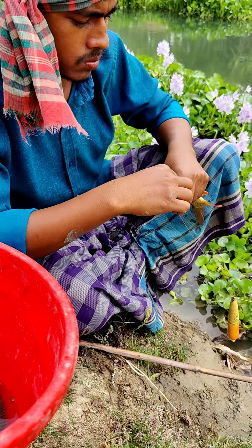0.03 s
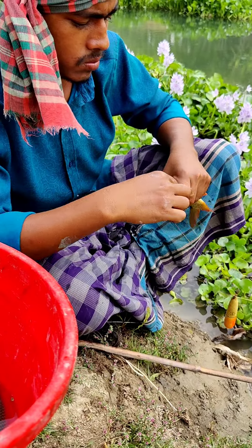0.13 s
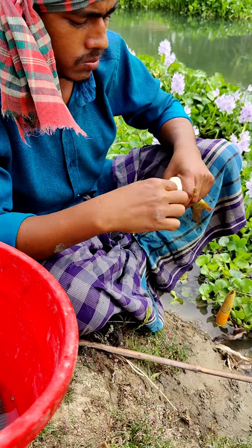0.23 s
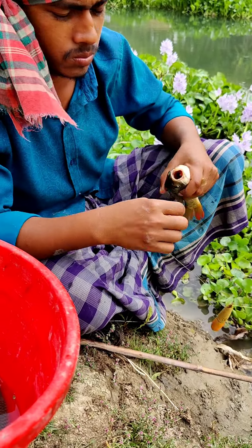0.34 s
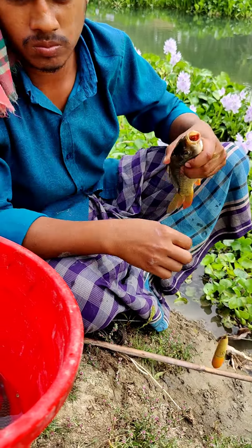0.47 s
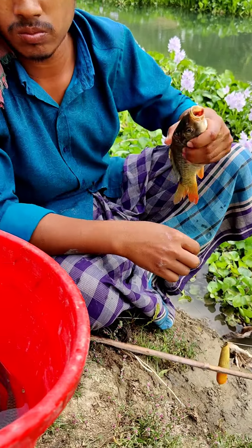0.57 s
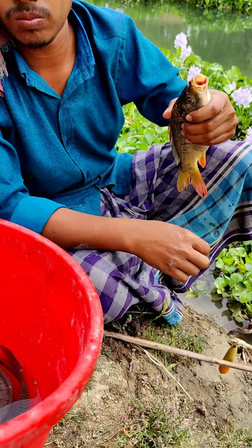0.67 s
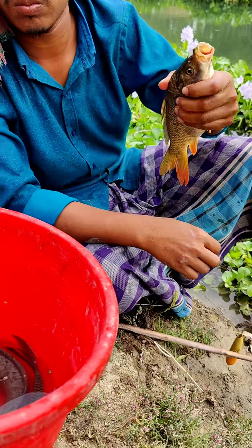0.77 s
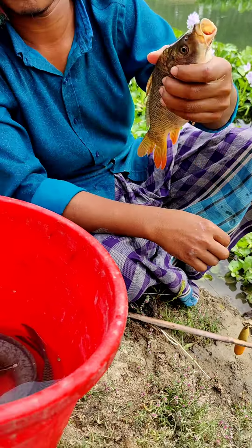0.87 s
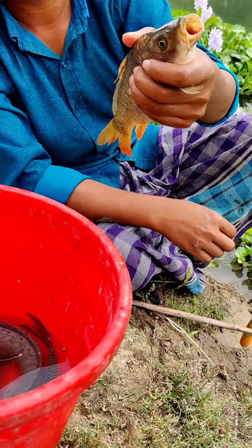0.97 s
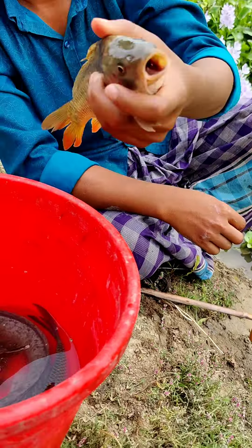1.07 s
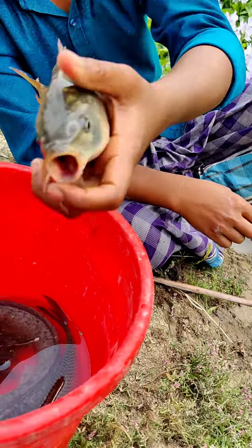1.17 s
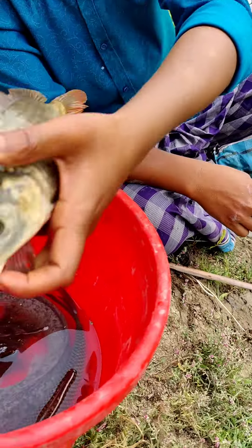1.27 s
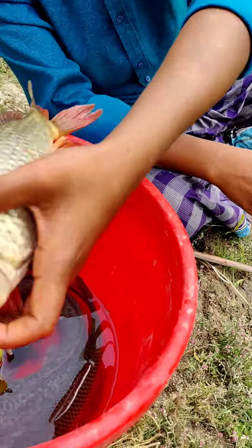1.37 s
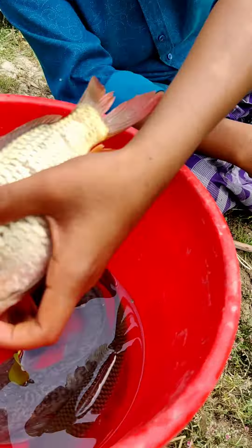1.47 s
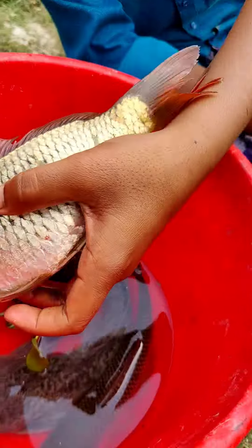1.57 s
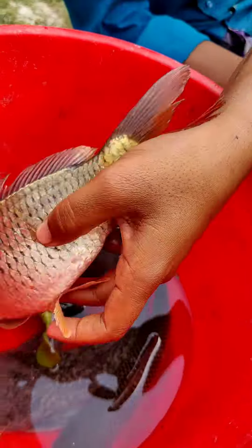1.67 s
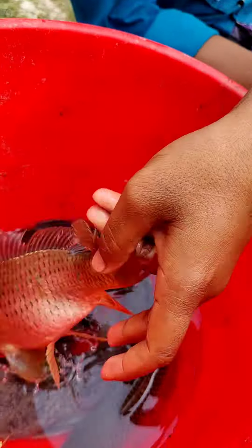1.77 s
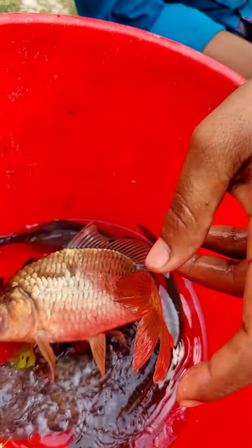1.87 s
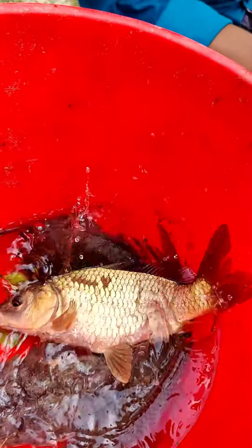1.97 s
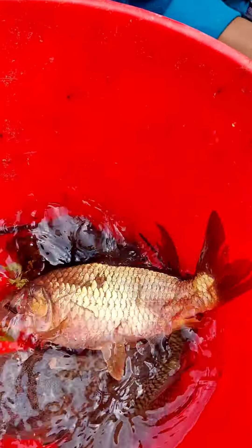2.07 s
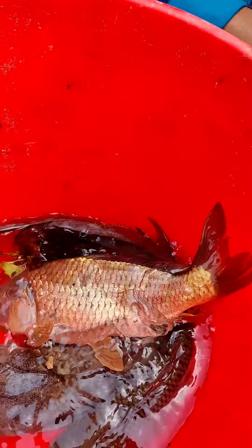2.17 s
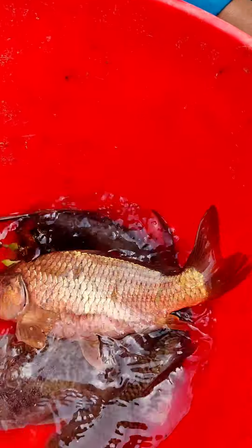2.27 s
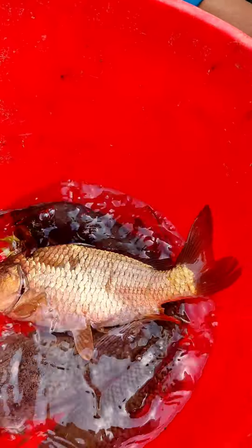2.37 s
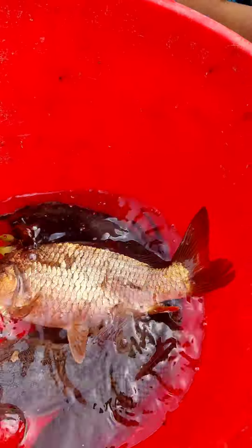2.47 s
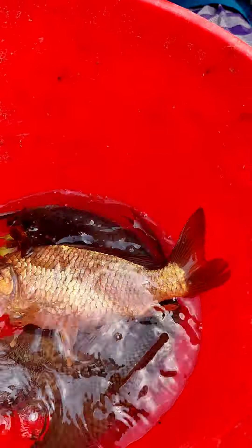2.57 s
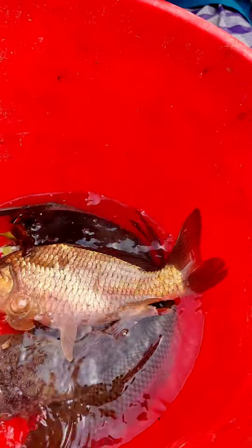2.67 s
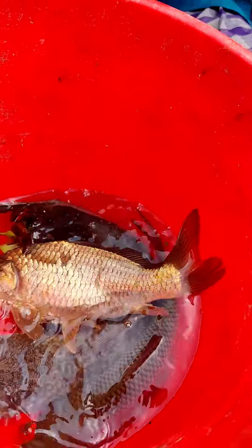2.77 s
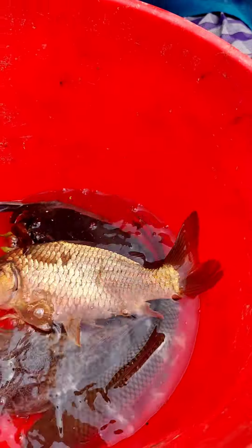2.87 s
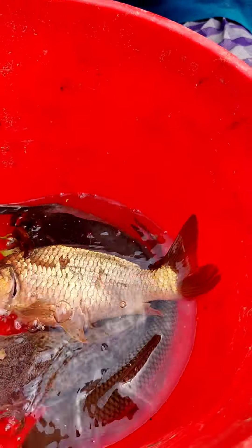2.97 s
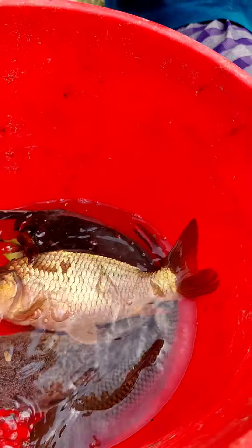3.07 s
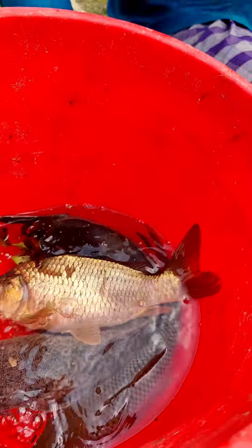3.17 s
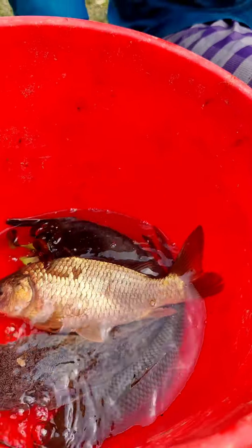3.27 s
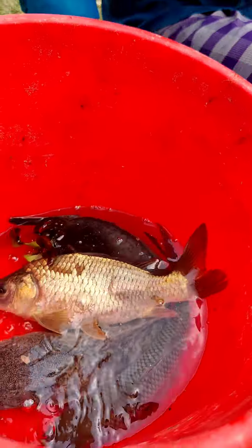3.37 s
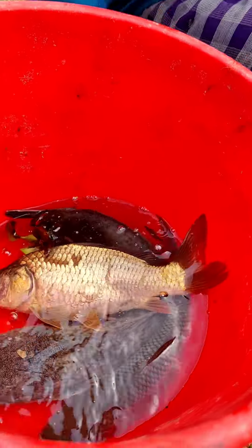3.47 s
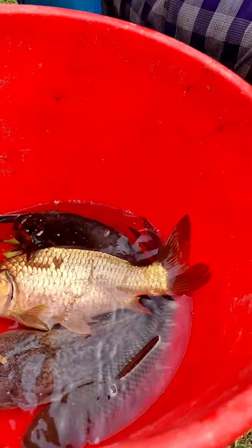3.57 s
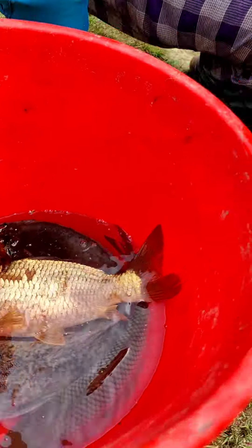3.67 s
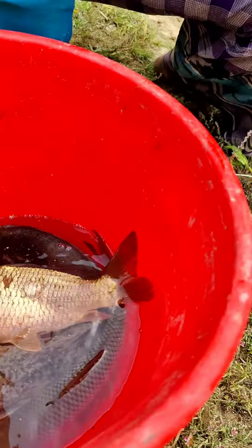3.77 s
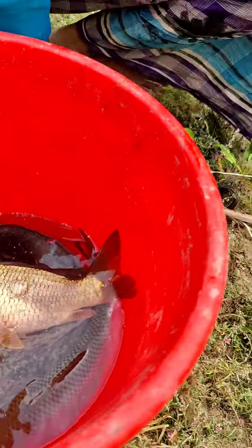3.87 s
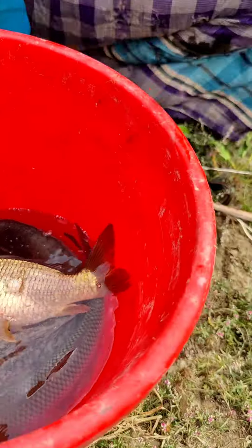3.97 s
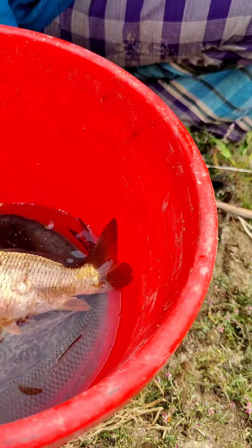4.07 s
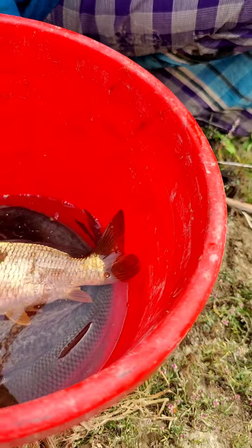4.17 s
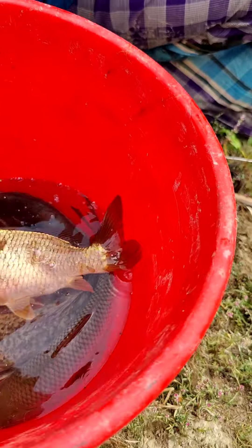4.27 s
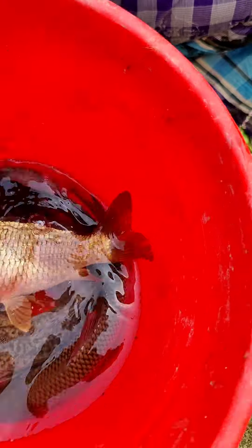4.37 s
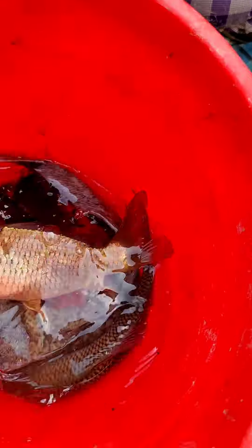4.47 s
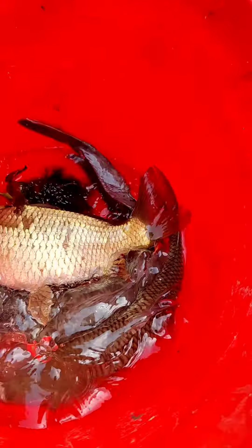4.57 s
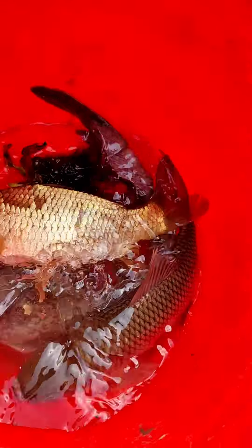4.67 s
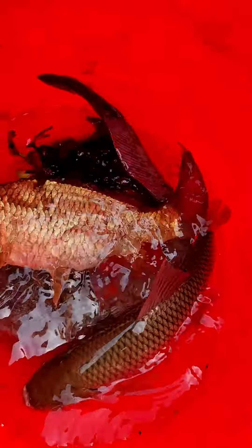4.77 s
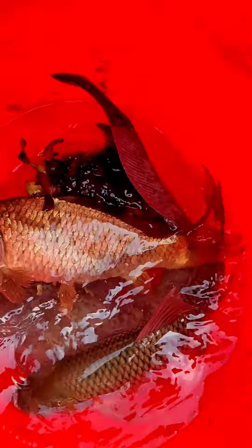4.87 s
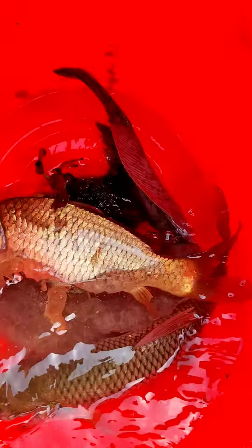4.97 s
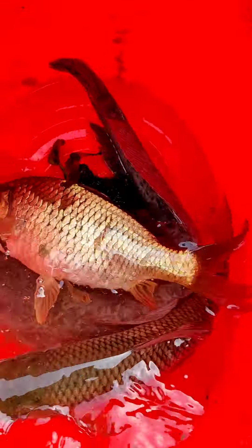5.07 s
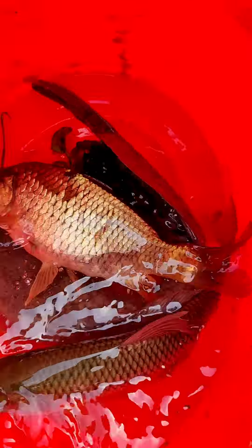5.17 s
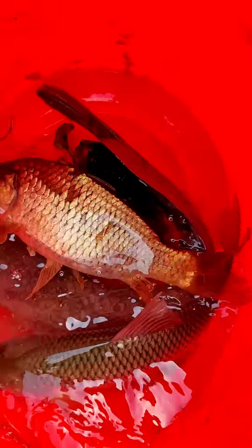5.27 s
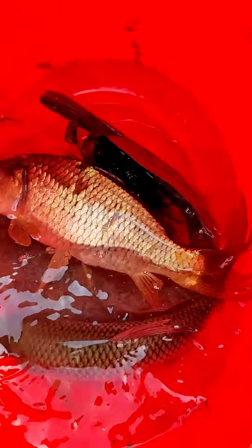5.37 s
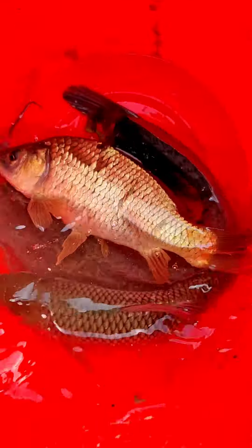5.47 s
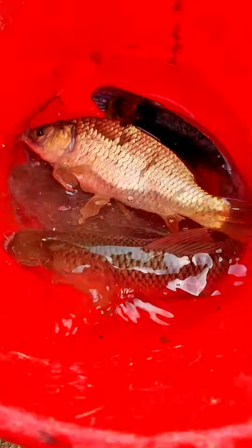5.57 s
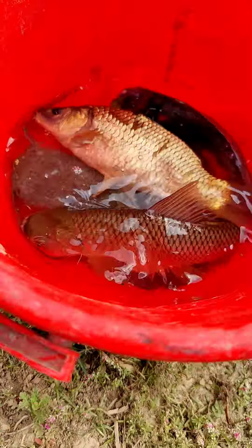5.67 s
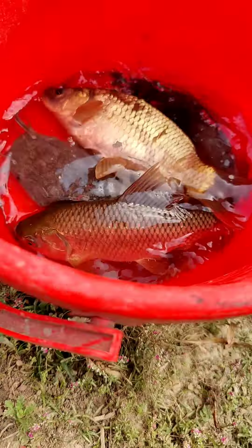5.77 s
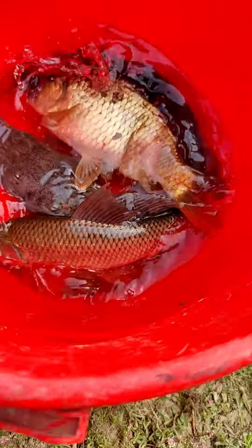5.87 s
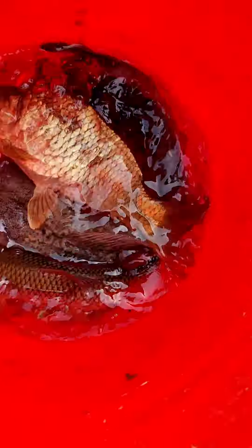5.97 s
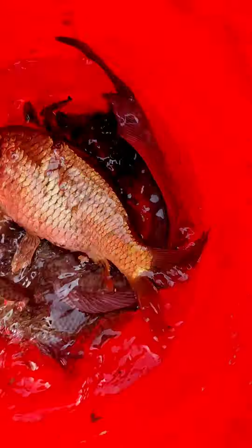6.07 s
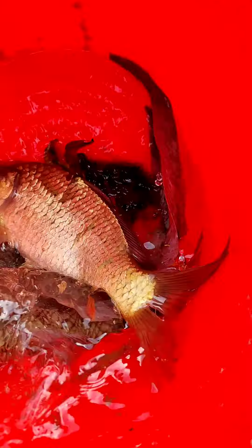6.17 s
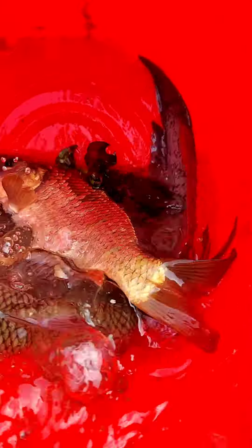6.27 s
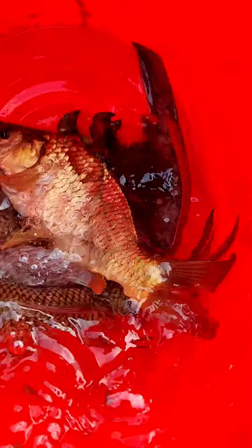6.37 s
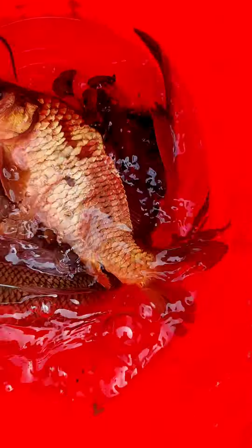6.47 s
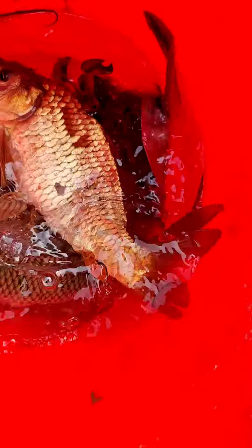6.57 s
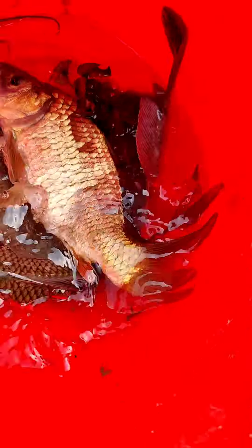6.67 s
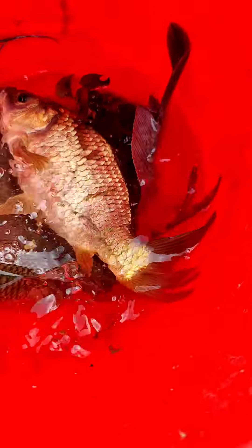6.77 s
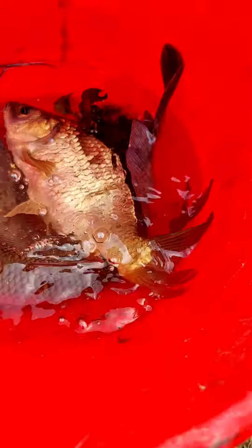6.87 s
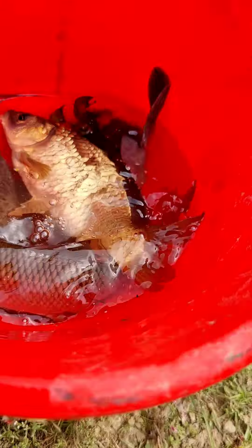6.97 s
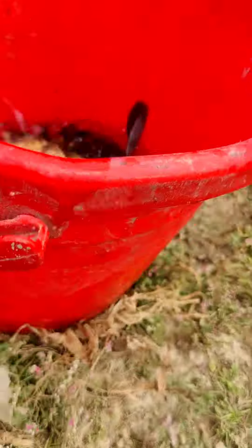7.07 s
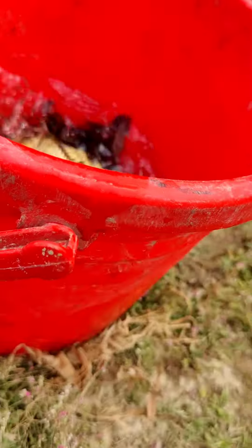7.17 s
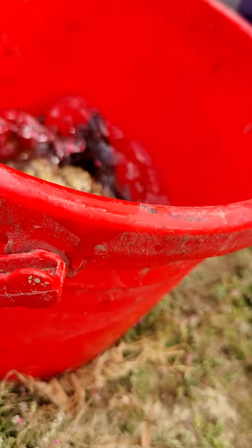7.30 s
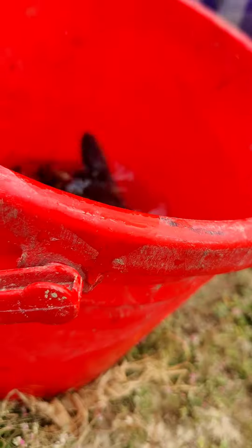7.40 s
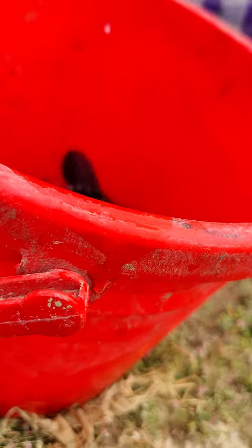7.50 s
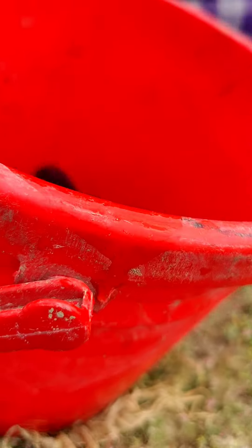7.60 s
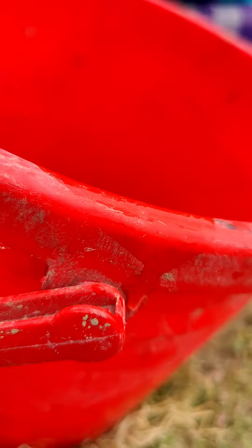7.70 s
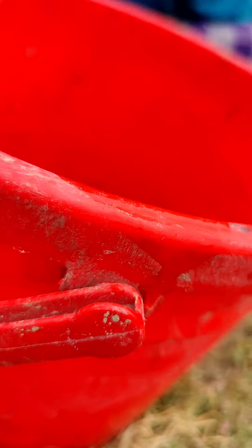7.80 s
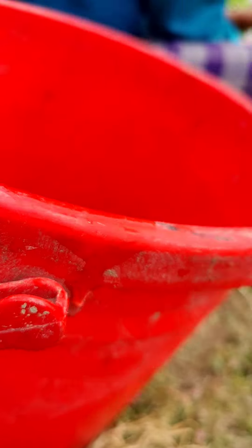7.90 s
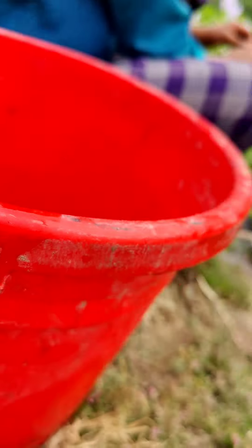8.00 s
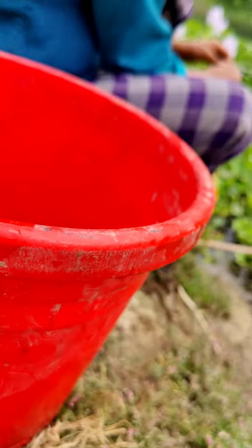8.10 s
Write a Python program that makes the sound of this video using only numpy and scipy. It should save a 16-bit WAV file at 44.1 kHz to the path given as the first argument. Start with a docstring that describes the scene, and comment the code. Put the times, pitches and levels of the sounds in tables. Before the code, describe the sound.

The opening is hushed: faint outdoor air, low rumble and a thin, high, pulsing insect trill, joined later by a second, rising rasp. At about 1.3 s a short, nasal bird call sounds faintly, with soft blurred far-off sounds. From 1.85 s a fish enters a plastic bucket close to the microphone: a soft thud, then a hard bright splash at 2.0 s with a rising bubble plop. Until 4.2 s it stays quiet, with small drips, low glugs around 2.9-3.2 s, a tiny upward gulp and another bird call at 3.6 s. At 4.3-5 s watery slosh, slaps and bubbles return, with muffled bumps and rubbing near 5.2 s. Sharp splashes burst out at 5.9 s, and thrashing with spray continues to 6.7 s. At 7.2 s a heavy, hollow boom hits the bucket, followed by quick slaps, bubbling and settling drips to 8 s.

```python
"""A carp is dropped into a plastic bucket where other fish lie in shallow water, on a river bank.
The fish thump the bucket (soft pulses of low tones), slap the water (swarms of noise bursts and droplets)
and churn up bubbles (gliding, ringing tones) and spray (coloured clicks), then writhe again in bouts.
Insects trill and rasp in the weeds (pulsed noise), a bird calls twice (arching harmonics through a
throat resonance), faint far-off sounds swell (banded noise) and the air rumbles faintly (coloured noise)."""
import sys
import numpy as np
from scipy import signal
from scipy.fft import rfft, irfft, next_fast_len
from scipy.io import wavfile

SR = 44100
rng = np.random.default_rng(int(sys.argv[2]) if len(sys.argv) > 2 else 0)


def int16_out(signal):
    """Quantize to a 16-bit WAV file."""
    q = np.round(np.clip(np.atleast_2d(signal).T, -1, 1) * 32767)
    wavfile.write(sys.argv[1], SR, q.astype(np.int16))


N = 358974
TIME = np.arange(N) / SR

# low rumble of the air: start_s, level_db
RUMBLE = [(0, -66.5), (1.7, -70), (3.3, -61.5), (4.2, -65), (6.3, -61), (8.1, -58)]
# tone colour of the rumble and of the outdoor hush: frequency_hz, relative_density_db
RUMBLE_COLOUR = [(20, -21), (40, 3), (60, 3), (85, -1), (120, -6.5), (170, -17), (260, -20), (500, -60)]
AIR_COLOUR = [(100, -24), (250, 7), (500, 3), (1000, 1), (2000, -4), (4000, -11.5), (7000, -12),
              (10000, -18), (13000, -14), (16000, -9.5)]
# trilling insect: start_s, syllables_per_s, level_db, pulsing_depth (0-1)
TRILL = [(0, 54, -75.5, 0.54), (.6, 28, -70.5, 0.3), (1.2, 62, -69.5, 0.3), (3, 34, -68, 0.2),
         (8.1, 49, -66, 0.28)]
# tone colour of the trill: frequency_hz, relative_density_db
TRILL_COLOUR = [(5200, -43), (5900, -34.5), (6400, -15), (6800, -6.5), (7150, -8.5), (7500, -14),
                (8200, -18), (8900, -24), (11000, -28), (13000, -39)]
# second insect, rasping upward: start_s, level_db
RASP = [(1.2, -93), (2.6, -71), (4.2, -78.5), (8.1, -82)]
# faint far-off sounds: start_s, level_db, length_s, centre_hz, width_hz
FAR_SOUNDS = [(0.592, -77.5, 0.09, 1920, 200), (1.30, -74, 0.48, 448, 202), (1.317, -75.5, 0.21, 1130, 400)]
# bird calls: start_s, level_db, pitch_hz (top of the arch)
BIRD_CALLS = [(1.295, -54, 873), (3.59, -56.5, 856)]
# hard slaps of tails and fins: start_s, level_db, fade_t60_s, low_edge_hz, high_edge_hz
SLAPS = [(1.635, -51, 0.028, 6870, 9600), (1.854, -49.5, .08, 1210, 4980), (1.884, -32.5, 0.069, 449, 7000),
         (1.901, -26, 0.027, 1310, 4710), (2.007, -14, .016, 2470, 12700), (2.037, -41, 0.11, 4600, 13300),
         (2.056, -36, .034, 1900, 13200), (2.064, -26, 0.064, 988, 12500), (2.131, -37, 0.027, 1130, 3070),
         (2.184, -32.5, 0.011, 3050, 12700), (2.296, -53, .05, 1030, 3750), (2.397, -55.5, .06, 1270, 3470),
         (2.661, -55, 0.025, 1110, 8500), (2.686, -48, 0.05, 434, 1350), (2.786, -47.5, 0.017, 3700, 13900),
         (2.826, -43.5, 0.027, 3070, 10800), (3.453, -51.5, 0.02, 1100, 3260),
         (3.647, -53.5, 0.018, 9800, 14000), (4.247, -45, 0.069, 1350, 2340),
         (4.31, -39.5, 0.078, 1440, 2880), (4.645, -42.5, 0.028, 910, 12600),
         (4.688, -38.5, 0.051, 4540, 14400), (4.745, -43, .02, 5030, 11600),
         (4.819, -33, 0.0077, 1130, 6030), (5.242, -45, 0.013, 1430, 12200),
         (5.374, -46.5, 0.042, 774, 1970), (5.875, -15, .013, 1930, 9900),
         (5.895, -28.5, 0.045, 3470, 10600), (5.927, -18.5, .018, 1574, 9650),
         (6.003, -24, .012, 5800, 9500), (6.036, -39, 0.028, 1440, 9700), (6.061, -37.5, 0.016, 6300, 8500),
         (6.192, -34.5, .016, 2070, 12900), (6.22, -32, 0.052, 1950, 9100), (6.377, -28, 0.014, 1410, 8700),
         (6.399, -27.5, .016, 6240, 10830), (6.41, -33.5, .022, 1190, 4940),
         (6.454, -36.5, 0.02, 6200, 12300), (6.532, -46.5, 0.029, 4030, 11700),
         (6.598, -35, 0.016, 2480, 10500), (6.652, -44, 0.037, 5250, 12600),
         (7.204, -29.5, 0.067, 2270, 12500), (7.231, -29.5, .032, 876, 4870),
         (7.251, -37, .016, 4550, 11600), (7.288, -27, 0.0076, 1230, 11500),
         (7.299, -26.5, 0.02, 1330, 8640), (7.423, -38, 0.067, 1210, 12300),
         (7.475, -36, 0.05, 1036, 10200), (7.502, -41, 0.022, 1230, 12000),
         (7.554, -30.5, 0.021, 950, 8150), (7.576, -41.5, 0.048, 970, 6150),
         (7.657, -38.5, 0.025, 680, 3760), (7.683, -36.5, .027, 884, 12100),
         (7.745, -41.5, 0.018, 680, 3600), (7.779, -46.5, 0.042, 585, 3660)]
# resonances of the bucket's inside: frequency_hz, width_hz, level_db
INSIDE = [(923, 136, -1.5), (1294.4, 337, 9.5), (1301, 310, 9.5), (1830, 660, -5.5), (2495, 150, -7),
          (3273, 880, -19.5), (4100, 59, -22.5)]
# bouts of writhing: start_s (at full strength), build_up_s, length_s, slosh_db, spray_db
BOUTS = [(1.871, 0.052, 0.19, -57, -61.5), (2.28, .1, 0.39, -73, -73.5), (3.052, .3, 0.4, -80.5, -80.5),
         (3.925, 0.26, .26, -77, -79), (4.327, 0.13, 0.01, -49, -60.5), (4.459, 0.067, 0.41, -57, -78),
         (4.667, 0.055, 0.16, -70, -60), (4.9, 0.084, 0.75, -61, -98), (5.226, 0.029, .1, -61, -66.5),
         (5.878, 0.24, 0.066, -49.5, -62), (6.198, 0.19, 0.22, -51.5, -58.5),
         (6.459, .05, 0.21, -58.5, -63), (6.695, 0.09, 0.67, -66.5, -81), (7.191, 0.29, 0.06, -44.5, -56),
         (7.442, 0.042, 0.23, -57, -61)]
# tone colour of the fine spray: frequency_hz, relative_density_db
SPRAY_COLOUR = [(2500, -26.5), (4200, -7), (5500, -19.5), (7300, 7.5), (10000, -2.5), (12000, -8.5),
                (15500, -2.5)]
# bodies hit the bucket: start_s, base_db, hollow_db, hollow_hz
THUMPS = [(1.886, -29, -20, 324), (1.939, -31.5, -55, 337), (2.005, -67, -42.5, 327.5),
          (2.469, -47.5, -72, 328), (3.031, -56.5, -61.5, 337), (4.256, -83, -44.5, 330),
          (5.173, -59, -36.5, 340), (5.204, -36, -28.5, 276), (5.237, -35, -40.5, 314),
          (5.33, -46, -59, 325), (5.426, -48, -58, 337), (5.906, -41.5, -65, 325), (6.023, -43.5, -69, 313),
          (6.271, -44.5, -52, 322), (6.346, -48, -41, 286), (6.373, -42, -41, 328),
          (6.409, -45, -35.5, 302), (6.503, -39.5, -53, 300), (6.779, -54, -46, 375),
          (6.881, -43, -56, 322), (7.048, -54, -46, 330), (7.197, -10.5, -14.5, 329.6),
          (7.86, -52, -66, 331)]
# tone colour of the rocking water: frequency_hz, relative_density_db
ROCK_COLOUR = [(20, -15), (38, 4.5), (55, 6.5), (80, -0.5), (120, -9.5), (170, -17), (260, -24),
               (500, -59.5)]
# large bubbles: start_s, level_db, pitch_hz (at the start), rise_octaves (over the ring time)
BUBBLES = [(2.071, -21, 1295, 0.75), (2.214, -44.5, 1545, .5), (2.52, -54, 920, -0.0047),
           (2.561, -40, 375, 0.018), (2.659, -48, 1340, 0.62), (2.688, -47.5, 371, 0.097),
           (2.907, -52, 533, 0.83), (2.933, -47, 398, 0.21), (3.088, -46.5, 448, 0.78),
           (3.125, -44.5, 343, 0.13), (3.206, -44.5, 341, 0.066), (4.334, -30, 1838, -0.05),
           (4.7, -32, 1382, -0.23), (4.819, -30.5, 1223, -0.14), (4.94, -35, 3960, -0.14),
           (5.176, -40.5, 874, -0.19), (5.896, -23.5, 2630, 0.76), (5.967, -35, 2170, 0.79),
           (6.003, -35.5, 950, 0.92), (6.193, -23, 1074, -0.29), (6.225, -25, 4350, 0.37),
           (6.297, -32.5, 1470, .9), (6.413, -29.5, 1535, 0.64), (6.596, -34, 2860, -0.13),
           (6.639, -39, 904, 0.53), (6.777, -40, 850, 0.62), (7.267, -26, 7100, 0.36),
           (7.299, -20, 1886, -0.51), (7.338, -36, 993, -0.34), (7.434, -35, 1063, -0.34),
           (7.477, -31.5, 2400, .4), (7.555, -33, 1103, 0.65), (7.857, -36.5, 920, 0.074),
           (7.896, -50, 725, 0.59), (7.983, -34.5, 7320, 0.28)]
# a body drags along the base: start_s, length_s, level_db
RUBS = [(2.535, .07, -59), (5.166, .15, -45), (6.274, 0.28, -52.5)]

# a bout: how far the level climbs in the build-up, how long the water takes to settle
BUILD_UP_DB, SETTLE_T60_S = 30.5, 0.63
# light flicks of the fins in a bout: middle level above its spray, spread either way
FLICKS_PER_S, FLICK_DB, FLICK_SPREAD_DB = 26, 14.5, 7
FLICK_T60_S, FLICK_LOW_HZ, FLICK_HIGH_HZ = 0.015, 2300, 11000
# rocking water: level after a 0 dB thump, share of the thump's dB, time to its top
ROCK_DB, ROCK_FOLLOWS, ROCK_PEAK_S = -33.5, 0.44, 0.049
# large bubbles: ring time at 1 kHz; it falls with this power of the pitch
BUBBLE_T60_S, BUBBLE_SHORTENS = 0.041, 0.67
# air glugs under a fish in a quick run
GURGLE_S, GURGLE_LENGTH_S, GURGLE_DB, GURGLES_PER_S, GURGLE_HZ = 2.9, 0.44, -58, 65, 371
# the air pocket closes
GULP_S, GULP_LENGTH_S, GULP_DB, GULP_FROM_HZ, GULP_TO_HZ = 3.208, 0.066, -54, 770, 1880
CUTOFF_HZ = 15900


def from_db(db):
    """Decibels to gain."""
    return 10 ** (np.asarray(db) / 20)


def rms_one(x):
    """Scale to unit rms."""
    return x / np.sqrt(np.mean(x ** 2) + 1e-20)


def in_time(rows):
    """Each column of a curve at every sample."""
    s, *columns = np.transpose(rows)
    return [np.interp(TIME, s, column) for column in columns]


def add(out, s, sound):
    """Mix a sound in at time s."""
    i = max(0, round(s * SR))
    out[i:i + len(sound)] += sound[:N - i]


def noise(count=N):
    """White noise with a spread of 1."""
    return rng.standard_normal(count)


def band(x, low, high, order=2):
    """Butterworth band-pass."""
    high = min(max(high, 1.1 * low), 0.45 * SR)
    sos = signal.butter(order, [low, high], "band", fs=SR, output="sos")
    return signal.sosfilt(sos, x + 1e-18)


def resonate(x, hz, width):
    """Two-pole resonance with unit gain on top."""
    r = np.exp(-np.pi * width / SR)
    zeros = np.array([1, 0, -1]) * (1 - r * r) / 2
    poles = [1, -2 * r * np.cos(2 * np.pi * hz / SR), r * r]
    return signal.lfilter(zeros, poles, x + 1e-18)


def coloured(x, spectrum):
    """Give a steady sound a smooth spectrum; rms 1."""
    hz, db = np.transpose(spectrum)
    size = next_fast_len(N)
    bins = np.maximum(np.arange(size // 2 + 1) * SR / size, 1)
    gain = from_db(np.interp(np.log(bins), np.log(hz), db, right=-120))
    return rms_one(irfft(rfft(x, size) * gain, size)[:N])


def drift(rate):
    """Slow chance with a spread of 1, drawn anew rate times a second and joined by lines."""
    knots = noise(int(N / SR * rate) + 2)
    return rms_one(np.interp(TIME * rate, np.arange(len(knots)), knots))


def grains(per_s, spread_db):
    """Random clicks, mostly small, a few large."""
    sizes = from_db(spread_db * np.minimum(rng.exponential(1, N), 4)) * rng.choice([-1, 1], N)
    return sizes * (rng.random(N) < per_s / SR)


def swell(t, peak_s):
    """A soft push that builds up to 1 and dies away."""
    return (t / peak_s * np.exp(1 - t / peak_s)) ** 2


def open_air(air_db=-78, gust_db=1.5):
    """A faint outdoor hush over a low, lumpy rumble, both of coloured noise."""
    rumble_db = in_time(RUMBLE)[0] + gust_db * drift(11)
    rumble = from_db(rumble_db) * coloured(noise(), RUMBLE_COLOUR)
    return rumble + from_db(air_db) * coloured(noise(), AIR_COLOUR)


def insects(rasp_low_hz=6450, rasp_high_hz=7650, rasp_width_hz=300, scrape_db=-5, rasps_per_s=4.38):
    """One insect trills in quick syllables of wing noise; another repeats a rising, scraping rasp."""
    per_s, db, depth = in_time(TRILL)
    syllables = 1 + np.clip(depth, 0, 1) * np.sin(2 * np.pi * np.cumsum(per_s) / SR)
    trill = from_db(db) * rms_one(syllables) * coloured(noise(), TRILL_COLOUR)
    stroke = (TIME - 0.045) * rasps_per_s % 1  # 0 to 1 through each rasp
    hz = rasp_low_hz + (rasp_high_hz - rasp_low_hz) * np.sqrt(stroke)
    sweep = np.sin(2 * np.pi * np.cumsum(hz) / SR)
    tone = rms_one(sweep * band(noise(), 27, rasp_width_hz))  # noise roughens the sweep
    scrape = rms_one(band(noise(), 5900, 9950, order=5))
    shape = np.sin(np.pi * stroke) * from_db(0.5 * drift(1.1))
    rasp = rms_one((tone + from_db(scrape_db) * scrape) * shape)
    return trill + from_db(in_time(RASP)[0]) * rasp


def far_sounds():
    """Soft, blurred swells of banded noise from far away."""
    out = np.zeros(N)
    for s, db, length_s, hz, width in FAR_SOUNDS:
        shape = np.hanning(int(length_s * SR))
        blur = rms_one(band(noise(len(shape)), hz - width / 2, hz + width / 2))
        add(out, s, from_db(db) * shape * blur)
    return out


def bird(length_s=0.072, arch=0.39, throat_hz=3350, throat_width_hz=260, hoarse=0.0068,
         echo_db=-10, echo_t60=0.7):
    """A short, hoarse, nasal call that arches in pitch, with a faint tail from the far bank."""
    out, t = np.zeros(N), np.arange(int(length_s * SR)) / SR
    bow = np.sin(np.pi * t / length_s)
    for s, db, top_hz in BIRD_CALLS:
        hz = top_hz * (1 - arch * (1 - bow) + hoarse * drift(990)[:len(t)])
        phase = 2 * np.pi * np.cumsum(hz) / SR
        voice = bow * sum(np.sin(k * phase) * 4 / k for k in range(3, 7))  # harmonics 3 to 6
        add(out, s, from_db(db) * resonate(voice, throat_hz, throat_width_hz))
    tail = noise(SR) * from_db(-60 * TIME[:SR] / echo_t60)
    return out + from_db(echo_db) * signal.oaconvolve(out, tail / np.linalg.norm(tail))[:N]


def bubble(hz, t60, rise, onset_cycles=0.17):
    """A trapped pocket of air rings and fades, its pitch gliding by rise octaves as it moves."""
    t = np.arange(int(t60 * SR) + 2) / SR
    phase = 2 * np.pi * np.cumsum(hz * 2 ** (rise * t / t60)) / SR
    return np.sin(phase) * from_db(-60 * t / t60) * (1 - np.exp(-t * hz / onset_cycles))


def droplets(low_hz, high_hz, span_s, count=12, cycles=55, rise=0.24):
    """A handful of tiny bubbles thrown up within span_s, the later ones weaker; unit energy."""
    out = np.zeros(SR // 4)
    for when, size in rng.random((count, 2)):
        hz = low_hz * (high_hz / low_hz) ** size
        ring = from_db(-18 * when) * bubble(hz, min(cycles / hz, 0.05), rise)
        i = int(when * min(span_s, 0.1) * SR)
        out[i:i + len(ring)] += ring
    return out / np.linalg.norm(out)


def slap(t60, low_hz, high_hz, grain_db=13.5, leak_db=-25, swell_share=0.92, burst_db=-4.0, wet=0.65):
    """A swarm of tiny bursts and ringing droplets; long slaps swell slowly, thin sheets sound higher."""
    t = np.arange(SR // 4) / SR
    swell_s = swell_share * t60 ** 2.03
    shape = np.minimum(t / swell_s, 1) * from_db(-60 * np.maximum(t - swell_s, 0) / t60)
    swarm = shape * noise(len(t)) * from_db(grain_db * noise(len(t)))
    burst = band(swarm, low_hz, high_hz, order=3) + from_db(leak_db) * band(swarm, 780, 10000)
    burst = from_db(burst_db) * burst / np.linalg.norm(burst)
    return np.linalg.norm(shape) * (burst + wet * droplets(low_hz, high_hz, 0.5 * t60))


def slaps():
    """The hard slaps of tails and fins on the water."""
    out = np.zeros(N)
    for s, db, t60, low_hz, high_hz in SLAPS:
        add(out, s, from_db(db) * slap(t60, low_hz, high_hz))
    return out


def inside(x):
    """The air in the bucket rings with several resonances, of alternating polarity."""
    return sum((-1) ** k * from_db(db) * resonate(x, hz, width)
               for k, (hz, width, db) in enumerate(INSIDE))


def bucket_walls(x, ring_db=-8, echo_db=-13, echo_t60=0.05, count=40):
    """Sound bounces between the close walls and wakes the resonances inside."""
    delays, signs = rng.uniform(0.0011, echo_t60, count), rng.choice([-1, 1], count)
    echoes = np.zeros(SR // 4)
    echoes[(delays * SR).astype(int)] = signs * from_db(-60 * delays / echo_t60)
    bounced = signal.oaconvolve(x, echoes / np.linalg.norm(echoes))[:N]
    return x + from_db(ring_db) * inside(x) + from_db(echo_db) * bounced


def bout_level(levels_db):
    """Gain curve: each bout builds up, holds and settles; overlapping bouts add in power."""
    power = 1e-14
    for (s, build_s, length_s, *_), db in zip(BOUTS, levels_db):
        build_db = BUILD_UP_DB * np.clip(s - TIME, 0, 2) / build_s
        settle_db = 60 * np.clip(TIME - s - length_s, 0, 2) / SETTLE_T60_S
        power = power + from_db(db - np.minimum(build_db + settle_db, 100)) ** 2
    return np.sqrt(power)


def gurgle(low_hz, high_hz, cycles, spread_db, count, rise=0.27, tilt_db=-1):
    """Many small bubbles of all sizes; rms 1."""
    out = np.zeros(N)
    for when, size, strength in rng.random((count, 3)):
        hz = low_hz * (high_hz / low_hz) ** size
        db = spread_db * min(-np.log(1 - strength), 3) + tilt_db * np.log2(hz / low_hz)
        add(out, when * N / SR, from_db(db) * bubble(hz, cycles / hz, rise))
    return rms_one(out)


def slosh(wash_db=-1.5, gurgle_db=-8, hum_gain_db=-4, direct_db=-14, hiss_db=-22,
          hum_hz=328, hum_width_hz=45, lap_db=-9, surge_db=4.0):
    """Churned water: a wash of clicks in the bucket's resonances, with small bubbles, hum and hiss."""
    churn = grains(6000, 4.44) * from_db(surge_db * drift(49))
    wash = rms_one(inside(churn) + from_db(direct_db) * band(churn, 240, 4000))
    rubbing = grains(1500, 4.4) * from_db(surge_db * drift(30))
    ringing = resonate(band(rubbing, 210, 520), hum_hz, hum_width_hz)
    hum = rms_one(ringing + from_db(lap_db) * band(rubbing, 210, 560))
    blips = gurgle(low_hz=623, high_hz=2485, cycles=26, spread_db=7.5, count=900, rise=0.51)
    hiss = rms_one(band(noise(), 1900, 8000, order=1))
    water = from_db(wash_db) * wash + from_db(gurgle_db) * blips
    return water + from_db(hum_gain_db) * hum + from_db(hiss_db) * hiss


def stirred_water(spray_gain_db=-2, drip_db=8, drip_growth=1.98, swirl_db=1.5):
    """Writhing fish churn the water; breaking the surface adds fine spray and drips."""
    *_, slosh_db, spray_db = np.transpose(BOUTS)
    churned = bout_level(slosh_db) * from_db(swirl_db * drift(14)) * slosh()
    mist = coloured(grains(880, 5.5) * from_db(1.5 * drift(79)), SPRAY_COLOUR)
    drips = gurgle(low_hz=3600, high_hz=14500, cycles=55, spread_db=6.5, count=2400, tilt_db=0)
    spray = bout_level(spray_db)
    # the drips' level grows more steeply than the spray's
    dripping = from_db(drip_db) * spray.max() * (spray / spray.max()) ** drip_growth
    return churned + from_db(spray_gain_db) * spray * mist + dripping * drips


def flicks(count=12):
    """All through a bout the fins flick the surface at uneven intervals, as hard as the bout is wet."""
    out = np.zeros(N)
    kinds = [slap(FLICK_T60_S, FLICK_LOW_HZ * thin, FLICK_HIGH_HZ * np.sqrt(thin))
             for thin in np.geomspace(0.5, 2, count)]
    for s, _, length_s, _, spray_db in BOUTS:
        for k, (when, strength, kind) in enumerate(rng.random(size=(40, 3))):
            after_s = (k + when) / FLICKS_PER_S
            if after_s < length_s:
                db = spray_db + FLICK_DB + FLICK_SPREAD_DB * (2 * strength - 1)
                add(out, s + after_s, from_db(db) * kinds[int(kind * count)])
    return out


def thumps(base_hz=88, base_peak_s=0.0072, hollow_peak_s=0.0089,
           wall_hz=190, wall_db=-5, wall_peak_s=0.0045,
           sway_hz=62, sway_db=-19, sway_t60=0.51, ring_db=-24, ring_t60=0.53):
    """A soft body flexes base and wall and booms the hollow; the loaded base sways on."""
    out, t = np.zeros(N), np.arange(SR // 2) / SR
    onset = 1 - np.exp(-t / base_peak_s)
    base = swell(t, base_peak_s) * np.sin(2 * np.pi * base_hz * t)
    base += from_db(wall_db) * swell(t, wall_peak_s) * np.sin(2 * np.pi * wall_hz * t)
    base += onset * from_db(sway_db - 60 * t / sway_t60) * np.sin(2 * np.pi * sway_hz * t)
    boom = swell(t, hollow_peak_s) + onset * from_db(ring_db - 60 * t / ring_t60)
    for s, base_db, hollow_db, hollow_hz in THUMPS:
        hollow = boom * np.sin(2 * np.pi * hollow_hz * t)
        add(out, s, from_db(base_db) * base + from_db(hollow_db) * hollow)
    return out


def rocking():
    """Every thump rocks the water against the base: a low rumble that swells and dies away."""
    power, t = np.zeros(N), TIME[:SR]
    for s, base_db, *_ in THUMPS:
        level = from_db(ROCK_DB + ROCK_FOLLOWS * base_db) * swell(t, ROCK_PEAK_S)
        add(power, s, level ** 2)
    return np.sqrt(power) * coloured(noise(), ROCK_COLOUR)


def bubbles():
    """The large bubbles; the smaller and higher, the shorter they ring."""
    out = np.zeros(N)
    for s, db, hz, rise in BUBBLES:
        t60 = BUBBLE_T60_S / (hz / 1000) ** BUBBLE_SHORTENS
        add(out, s, from_db(db) * bubble(hz, t60, rise))
    return out


def rubs(low_hz=170, high_hz=430, stick_db=4):
    """A wet flank sticks and slips on the base in a low, rough burble; the drag swells and fades."""
    drag = np.zeros(N)
    for s, length_s, db in RUBS:
        add(drag, s, from_db(db) * np.hanning(int(length_s * SR)))
    return drag * rms_one(band(grains(900, 3.1) * from_db(stick_db * drift(60)), low_hz, high_hz))


def gulp(flutter_db=4, rough_hz=140, glug_t60=0.071, glug_rise=0.3, glug_spread_db=3, glug_octaves=0.37):
    """A run of low glugs; then the air pocket fills with water, its rough note sliding up ever faster."""
    out = np.zeros(N)
    count = int(GURGLES_PER_S * GURGLE_LENGTH_S)
    for k, (when, size, strength) in enumerate(rng.uniform(-0.97, 1, size=(count, 3))):
        glug = bubble(GURGLE_HZ * 2 ** (glug_octaves * size), glug_t60, glug_rise, onset_cycles=1.3)
        s = GURGLE_S + (k + 0.5 + 0.5 * when) / GURGLES_PER_S
        add(out, s, from_db(GURGLE_DB + glug_spread_db * strength) * glug)
    filled = np.linspace(0, 1, int(GULP_LENGTH_S * SR))
    hz = GULP_FROM_HZ + (GULP_TO_HZ - GULP_FROM_HZ) * filled ** 2
    rough = rms_one(band(noise(SR), 11, rough_hz)[-len(filled):])
    shape = np.sin(np.pi * filled ** 1.1) * from_db(GULP_DB + flutter_db * drift(177)[:len(filled)])
    add(out, GULP_S, shape * rough * np.sin(2 * np.pi * np.cumsum(hz) / SR))
    return out


def scene(dip_hz=5550, dip_width_hz=1000):
    """The bucket close by, its splashes a little hollow in the treble; the river bank around it."""
    splashes = bucket_walls(slaps() + flicks() + bubbles() + gulp())
    bucket = thumps() + rocking() + rubs() + splashes + stirred_water()
    bucket = bucket - 0.75 * resonate(bucket, dip_hz, dip_width_hz)
    return (bucket + insects() + bird() + far_sounds() + open_air())[None]


def record(dry):
    """A steep low-pass cuts the top."""
    return signal.sosfilt(signal.ellip(10, 0.2, 80, CUTOFF_HZ, fs=SR, output="sos"), dry)


dry = scene()
out = record(dry)
int16_out(out)
```